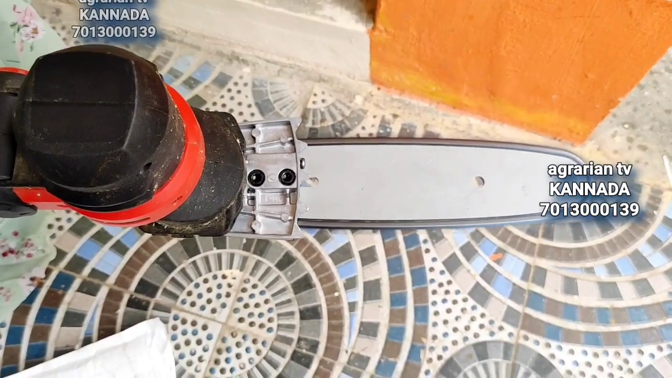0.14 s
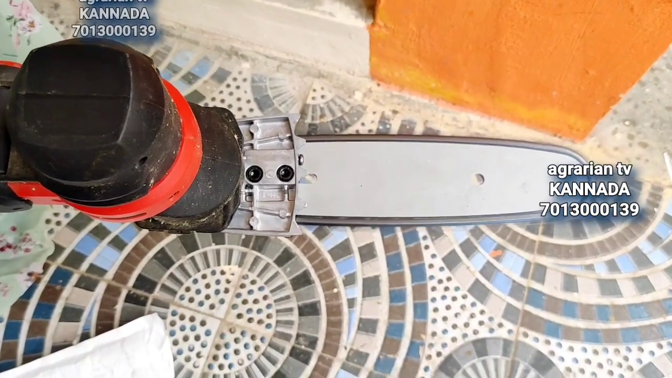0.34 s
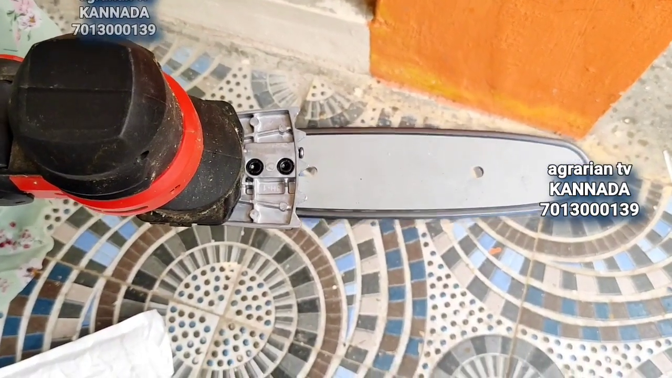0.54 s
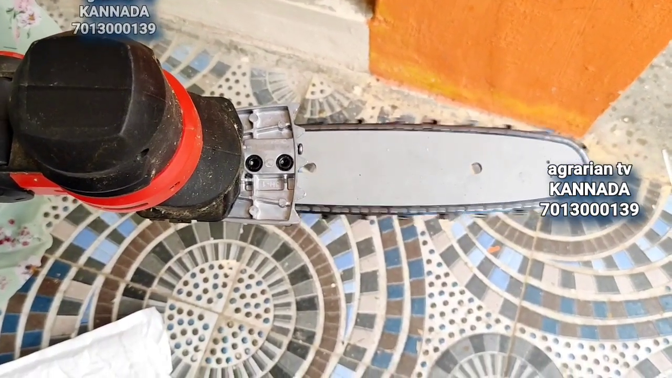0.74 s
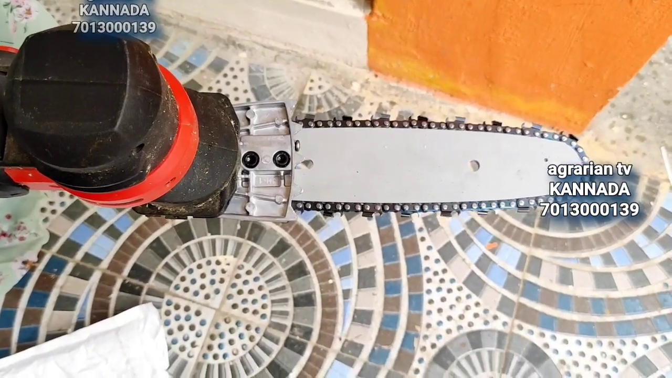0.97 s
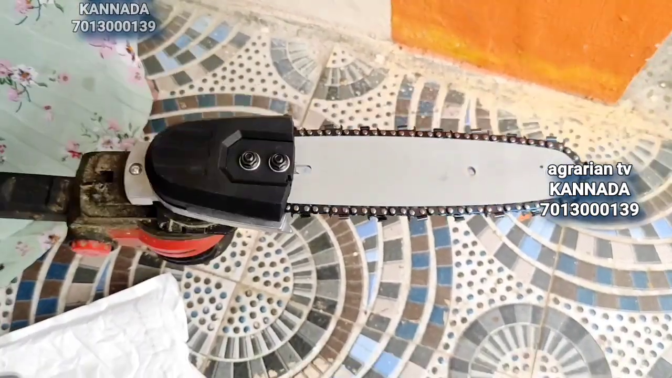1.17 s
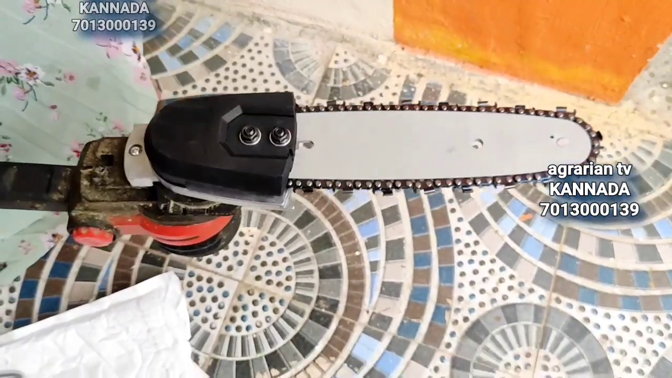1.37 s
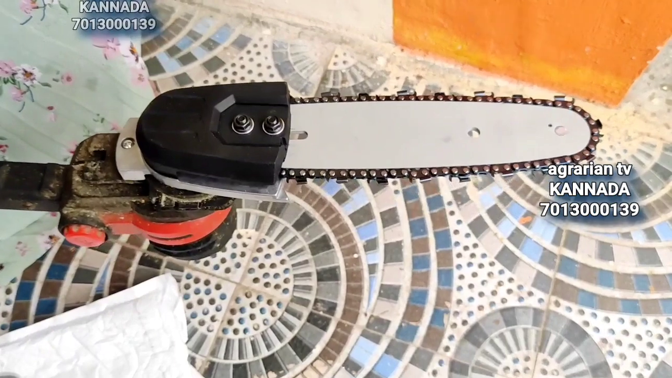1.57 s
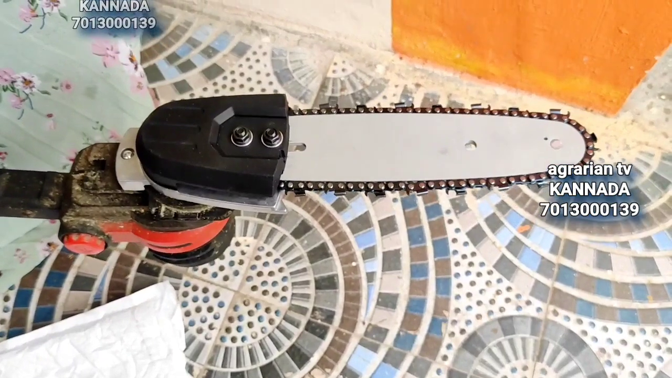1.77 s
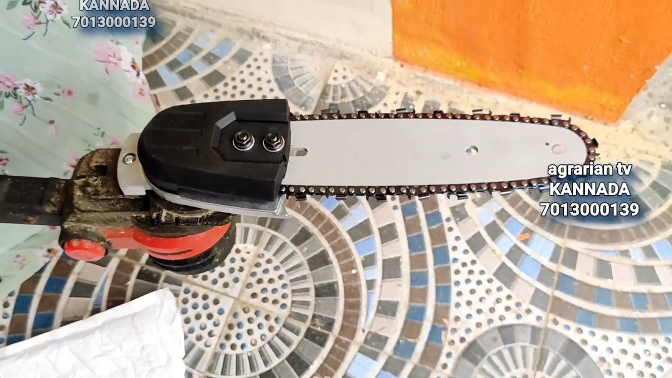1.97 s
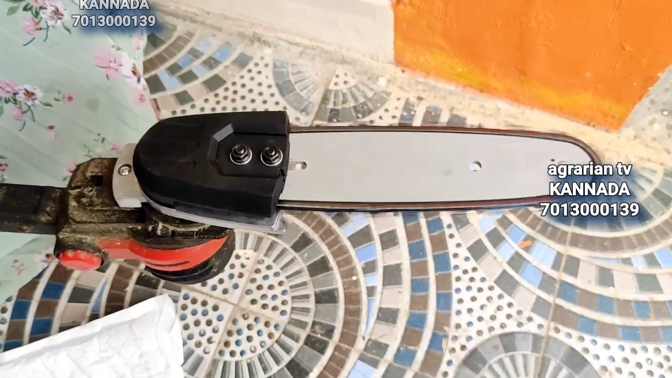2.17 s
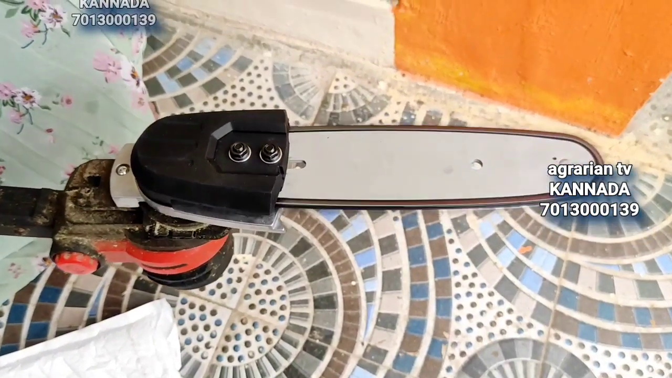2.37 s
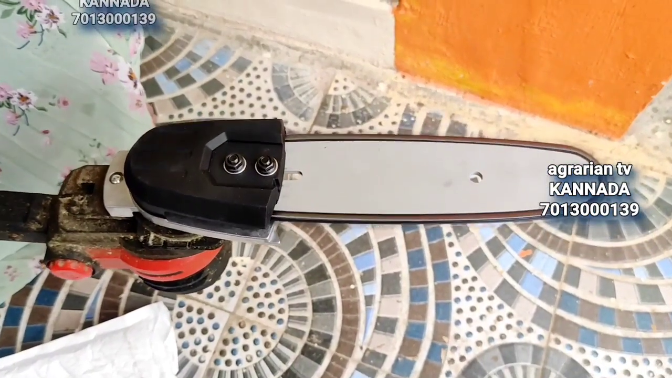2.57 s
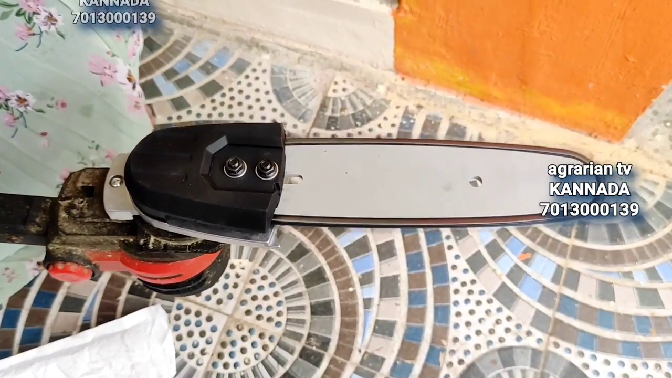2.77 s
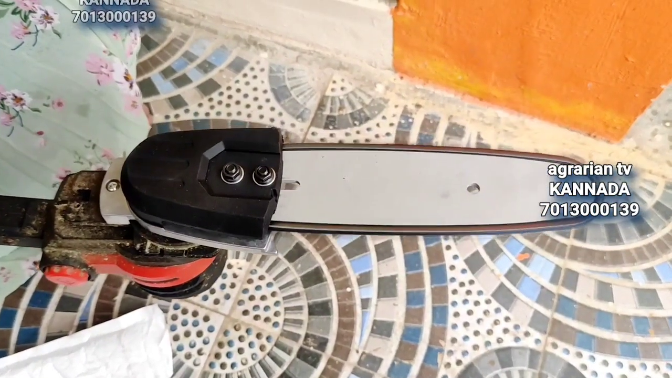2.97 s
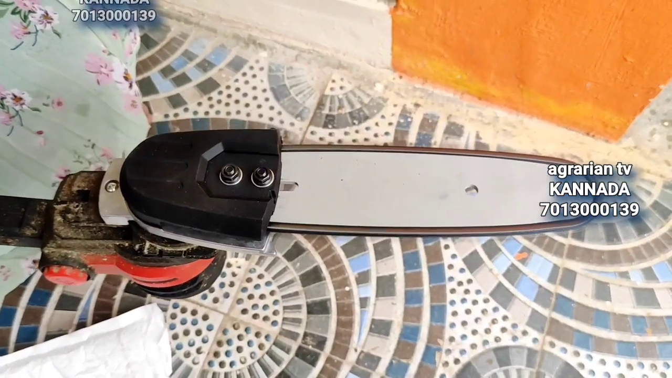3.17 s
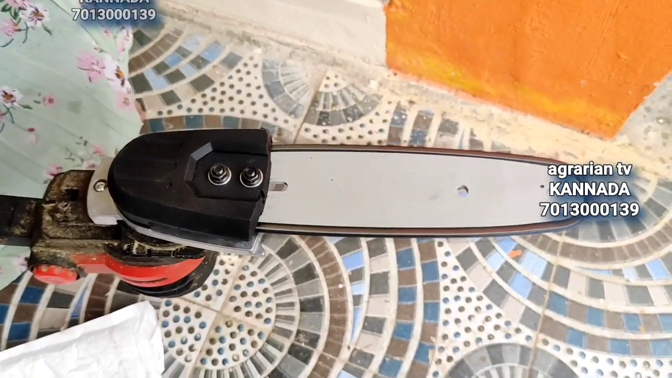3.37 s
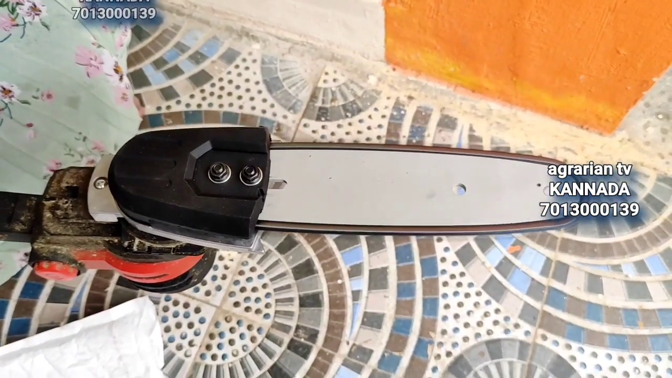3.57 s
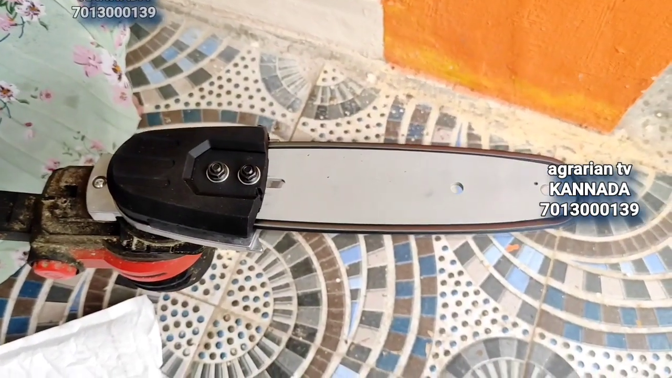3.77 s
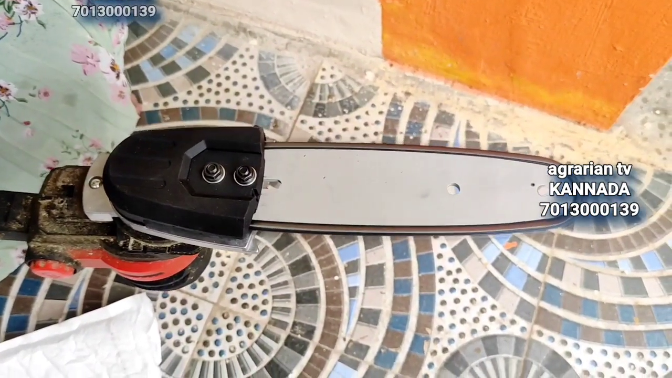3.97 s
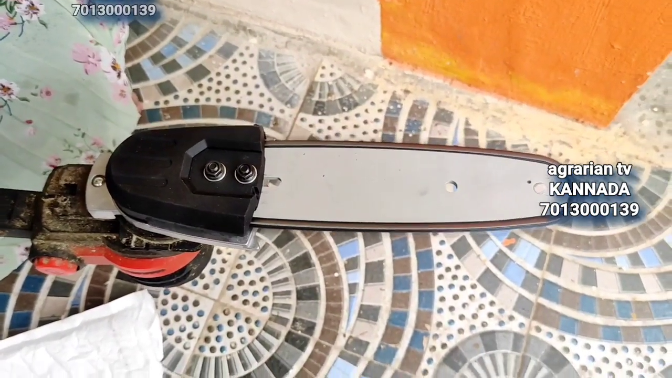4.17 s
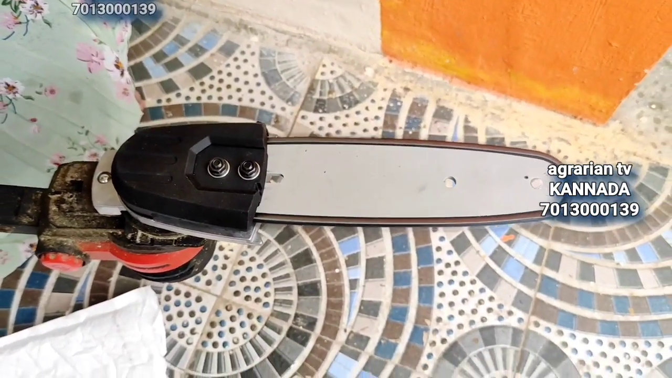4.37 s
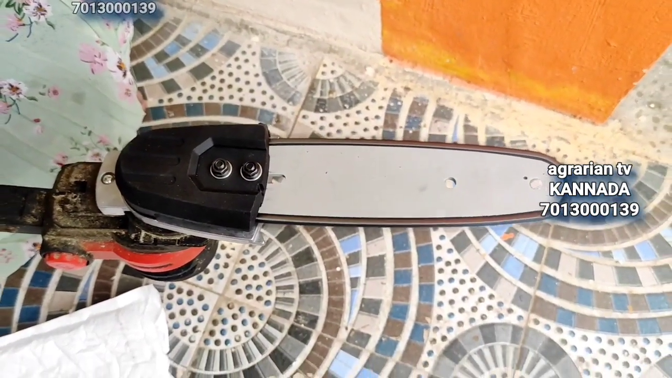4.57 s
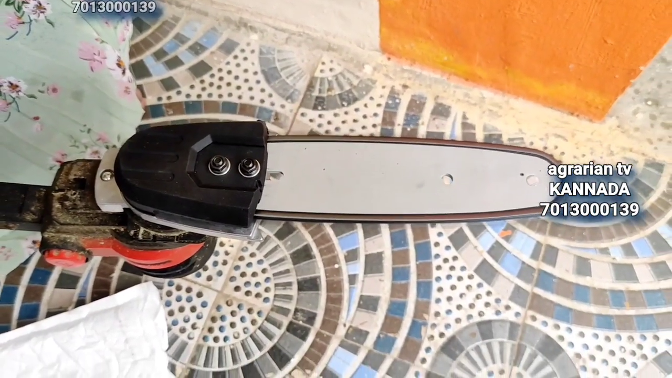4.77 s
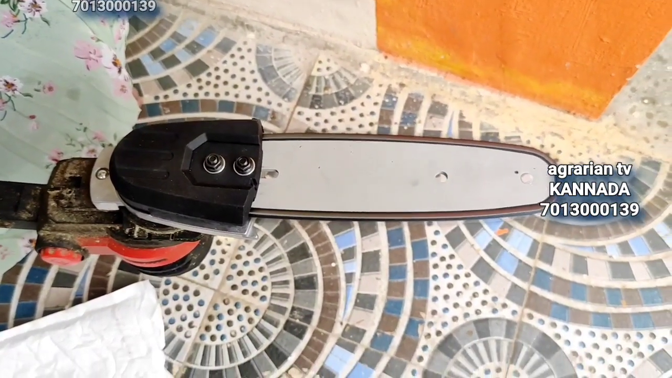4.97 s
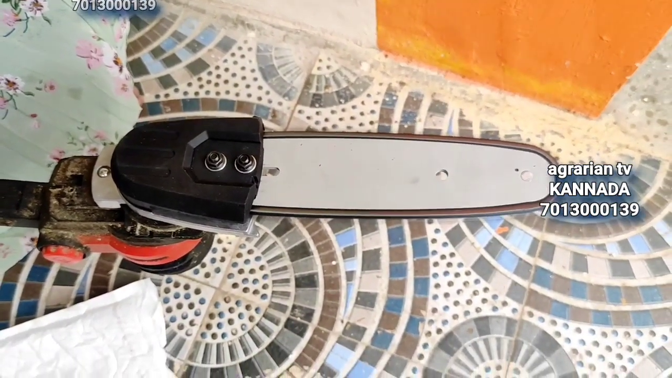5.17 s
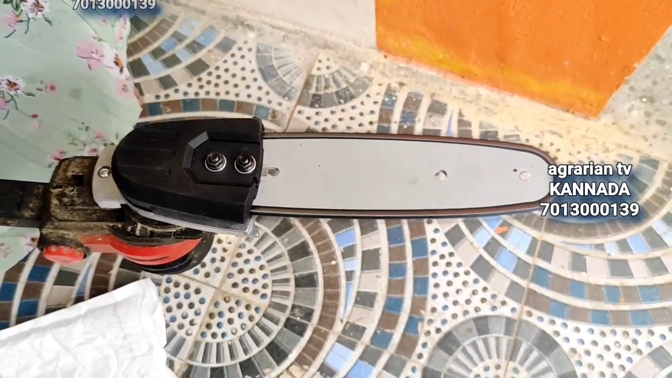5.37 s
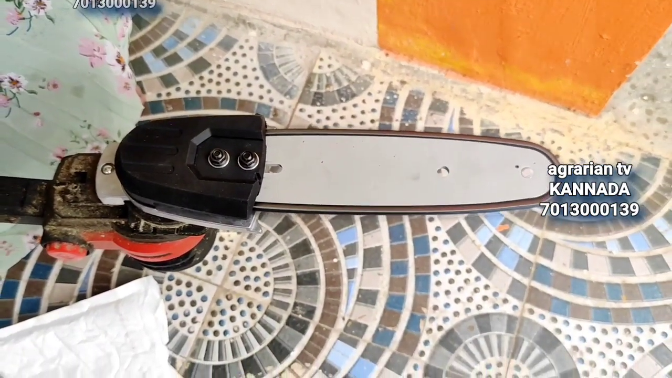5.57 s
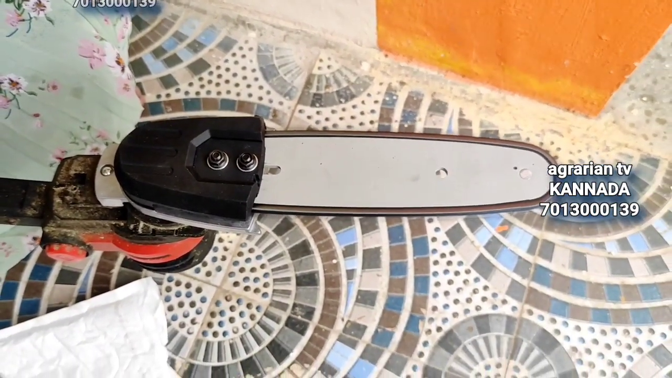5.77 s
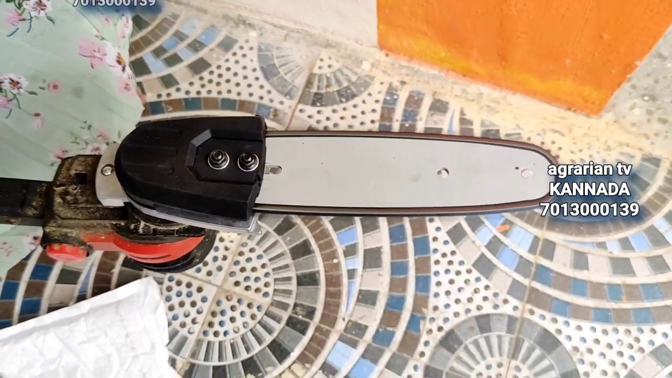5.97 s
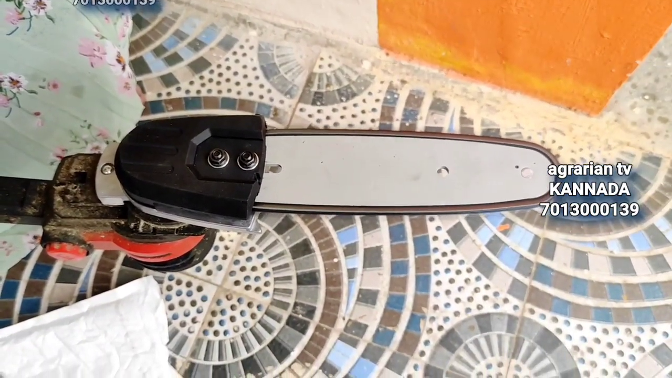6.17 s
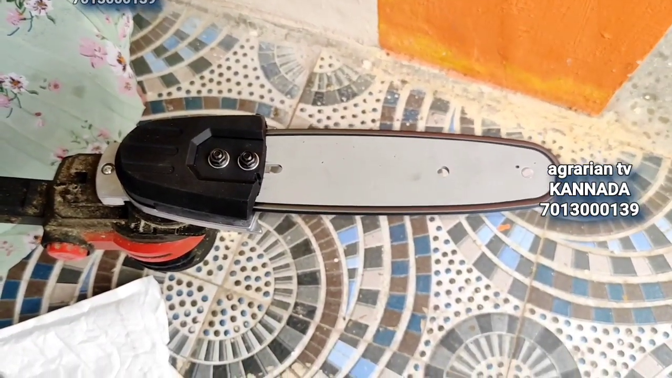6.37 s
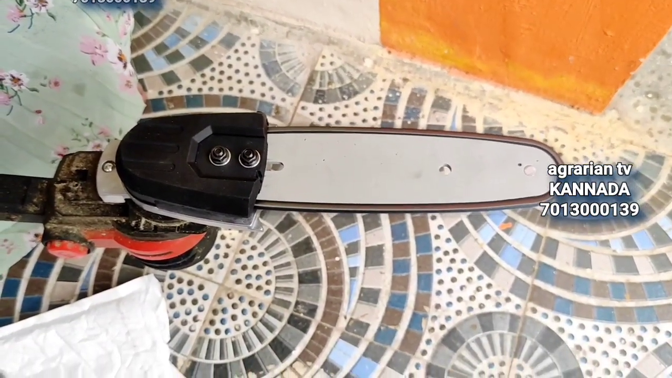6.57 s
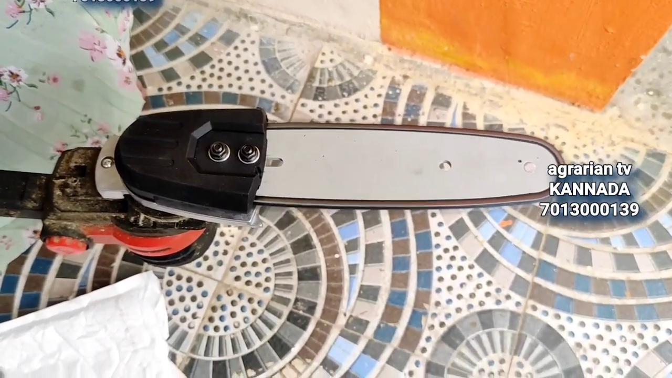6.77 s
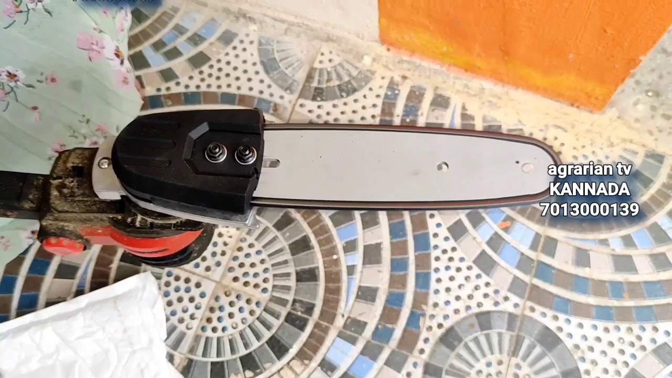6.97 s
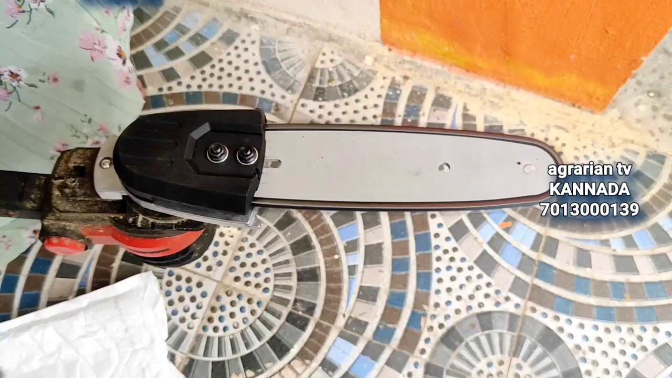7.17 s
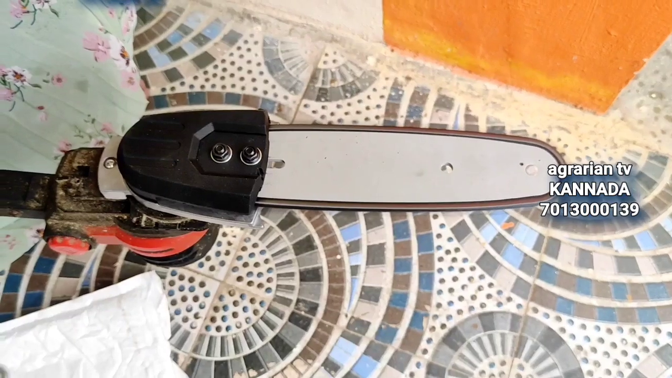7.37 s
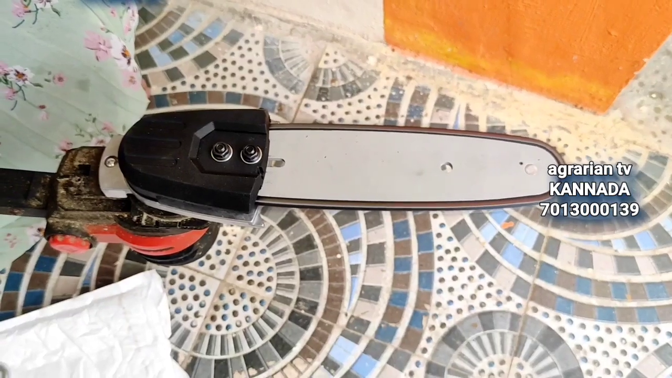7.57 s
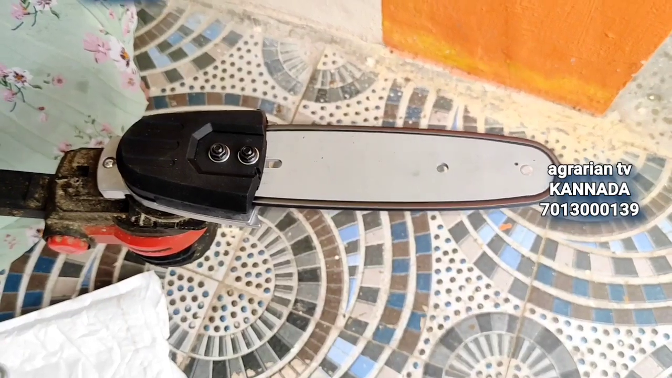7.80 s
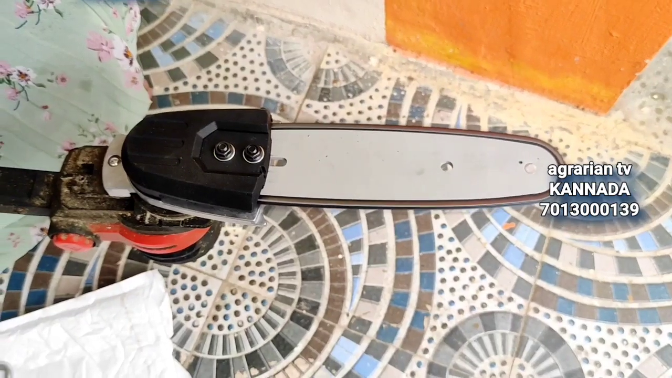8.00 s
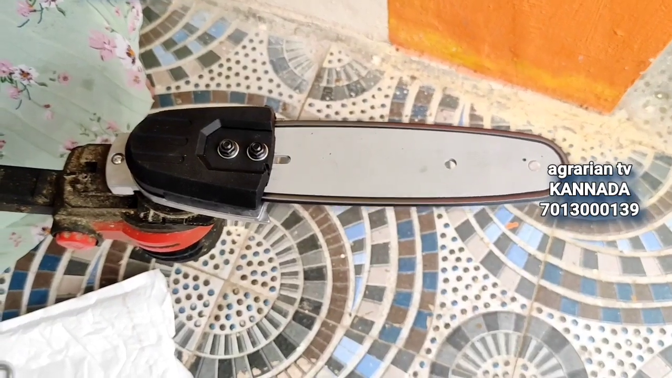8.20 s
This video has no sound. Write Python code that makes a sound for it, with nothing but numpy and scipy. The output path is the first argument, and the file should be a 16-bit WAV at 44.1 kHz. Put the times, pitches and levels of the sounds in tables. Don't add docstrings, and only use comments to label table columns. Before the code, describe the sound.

Close up in a tiled room, a battery chain cutter winds down, is handled, clicks on and races back to a bright, rattling whine.

```python
import sys
import numpy as np
from scipy import signal
from scipy.fft import rfft, irfft, next_fast_len
from scipy.io import wavfile
from scipy.ndimage import uniform_filter1d

SR = 44100
rng = np.random.default_rng(int(sys.argv[2]) if len(sys.argv) > 2 else 0)


def volts_from_db(level):
    exponent = np.asarray(level, float) / 20
    return 10 ** exponent


def materialize(psi):
    bounded = np.clip(np.atleast_2d(psi).T, -1, 1)
    quanta = np.round(bounded * 32767).astype(np.int16)
    wavfile.write(sys.argv[1], SR, quanta)


N = 363384

# (frequency [Hz], level [dB per Hz])
BODY = [(88, -62.5), (150, -22), (267, -22.5), (312, -21.5), (936, -15), (1050, -9), (1270, -11.5),
        (1980, -10), (3470, -4.5), (3670, -4.5), (3970, -4.5), (4370, -6), (7080, -10.5), (14300, -22),
        (15000, -65)]
# (frequency [Hz], width [Hz], level [dB])
RINGS = [
    [(647, 80, 5), (1640, 470, 5), (2620, 540, 6), (3040, 32, 5.5), (3340, 36, 9), (3744, 70, 9.5),
     (5180, 160, 3.5), (6940, 800, 5.5)],
    [(615, 45, 3), (1155, 270, 1.5), (1700, 140, 1), (2200, 83, -0.5), (2365, 330, 6), (3330, 118, 2),
     (3823, 97, 5), (5000, 300, 1.5), (7120, 580, 6)],
]
# (time [s], level [dB], left-right [dB])
BAR = [
    [(0, -26.5, -2.5), (.45, -22, 1), (.7, -20.5, 5), (1.024, -31, -2), (1.07, -44.5, 5), (1.17, -54, -5.5),
     (1.41, -63, 7)],
    [(2.48, -41, -4), (2.516, -24, 4.5), (2.59, -14, 1.5), (2.92, -16, -1), (3.2, -16, 1), (4.1, -17, 0),
     (4.85, -18, 3), (5.6, -20, 1.5), (6.5, -21, 3), (7.55, -23.5, 0.5), (8.24, -21.5, 5)],
]
STEADY_DB = -18.5
FULL_PULL_HZ_PER_S = 400


def evened(x):
    return x / np.sqrt(np.mean(x ** 2) + 1e-20)


def read(points, hz):
    f, value = np.transpose(points)
    return np.interp(np.log(hz + 1), np.log(f + 1), value)


def columns(rows, t):
    s, *values = np.transpose(rows)
    return [np.interp(t, s, v) for v in values]


def drift(top_hz, count):
    steps = rng.standard_normal((count, N // 128 + 2))
    hz = np.fft.rfftfreq(steps.shape[1], 128 / SR)
    smooth = irfft(rfft(steps) / (1 + (hz / top_hz) ** 2), steps.shape[1])
    at = np.arange(N) / 128
    return np.array([np.interp(at, np.arange(len(v)), evened(v)) for v in smooth])


def coloured(x, gain_db):
    size = next_fast_len(N)
    gain = volts_from_db(gain_db(np.fft.rfftfreq(size, 1 / SR)))
    return irfft(rfft(x, size) * gain, size)[..., :N]


def shaped(x, gain_db):
    hz, s, z = signal.stft(x, SR, nperseg=512, noverlap=384)
    z = z * volts_from_db(gain_db(hz[:, None], s))
    return signal.istft(z, SR, nperseg=512, noverlap=384)[1][..., :N]


def add(mix, s, sound):
    part = mix[..., round(s * SR):][..., :sound.shape[-1]]
    part += sound[..., :part.shape[-1]]


def spaced(x):
    return np.array([np.roll(x, 10), x])


def resonances_db(hz, peaks):
    return sum(db / (1 + (2 * (hz - f) / width) ** 2) for f, width, db in peaks)


def body_db(hz, peaks):
    return read(BODY, hz) + resonances_db(hz, peaks)


def bar(s):
    # (time [s], level [dB], length [s], left-right [dB])
    whips = [(.03, 5, .03, 1), (.5, 1, 0.01, 4), (.62, -5, 0.058, 0.5), (.67, 3.5, .03, -1.5),
             (3.05, 2, 0.018, 0.5), (3.09, -0.5, 0.036, -4), (3.64, 2, 0.17, -1), (4.87, -1.5, .05, 5.5),
             (5.87, -0.5, 0.022, 3.5), (5.93, 1, 0.042, -7), (6.0, 0, .04, 5), (6.14, -2, 0.077, -5),
             (6.66, 3, 0.064, -2), (6.8, -1.5, 0.14, -1.5), (6.865, 8, 0.02, -1), (7.14, 0, .06, -2),
             (7.25, 0.5, 0.06, 4), (7.31, -4.5, 0.043, -3), (7.38, 5.5, 0.13, -4)]
    rest = [(1.425, -105, 2), (2.47, -62, -2)]
    level, pan = columns(BAR[0] + rest + BAR[1], s)
    bumps = np.array([np.exp(-((s - at) / length) ** 2) for at, _, length, _ in whips])
    _, whip, _, aside = np.transpose(whips) @ bumps
    return level, whip, pan + aside


def rattle_clumps(hz, s):
    # (frequency [Hz], depth [dB])
    clump_depth = [(300, 0), (3000, 3.5), (8000, 2), (12000, 3)]
    high = np.clip(np.log2(hz / 5000 + 1e-9), 0, 1)
    noise = uniform_filter1d(rng.standard_normal((len(s), len(hz))), size=18, axis=0).T
    narrow = evened(uniform_filter1d(noise, size=2, axis=0))
    wide = evened(uniform_filter1d(noise, size=12, axis=0))
    return read(clump_depth, hz) * ((1 - high) * narrow + high * wide)


def chain(rotor_hz):
    # (treble [dB], bass [dB], left-right [dB])
    wander_db = (-3, 1.5, 0.5)
    # (start [s], growth [s], frequency [Hz], width [Hz], level [dB])
    loose_cover = (6.9, .6, 2370, 90, 8)
    links_per_turn = 6 * 11 / 40
    links = np.cumsum(rotor_hz * (1 + 0.12 * drift(60, count=1)[0])) * links_per_turn / SR
    knocks = (np.diff(np.floor(links), prepend=0) > 0) * volts_from_db(rng.standard_normal(N))
    bursts = signal.oaconvolve(knocks, np.exp(-np.arange(2000) / (0.0016 * SR)))[:N]
    bursts /= np.sqrt(uniform_filter1d(bursts ** 2, size=4000) + 1e-9)

    coasting = np.gradient(rotor_hz) * SR < -50
    knock = np.where(coasting, 0.45, 0.37)
    knock = knock * np.clip(rotor_hz / 120 - .3, 0, 1)
    envelope = knock * bursts + 1 - knock
    envelope /= np.sqrt(uniform_filter1d(envelope ** 2, size=4000))

    common, *apart = rng.standard_normal((3, N))
    own = 0.89
    rattle = np.sqrt(1 - own ** 2) * spaced(common * envelope) + own * np.array(apart) * envelope
    rattle = rattle * volts_from_db(drift(57, count=2))
    first, second = (coloured(rattle, lambda hz: body_db(hz, peaks)) for peaks in RINGS)
    rattle = np.where(np.arange(N) < 2 * SR, first, second)

    def lean_db(hz, s):
        level, whip, pan = bar(s)
        wander = [db * evened(uniform_filter1d(rng.standard_normal(len(s)), size=30)) for db in wander_db]
        speed = np.interp(s * SR, np.arange(N), rotor_hz)
        slow = np.log2(rotor_hz.max() / speed)
        treble = -0.5 - 3.5 * slow - 0.48 * whip + wander[0]
        bass = -3.5 + 0.41 * (STEADY_DB - level) - 0.27 * whip + wander[1]
        high = np.clip(np.log2(hz / 5000 + 1e-9), 0, 1)
        low = np.clip(np.log2(2000 / (hz + 1)), 0, 1)
        level = level + whip + treble * high + bass * low + rattle_clumps(hz, s)
        pull = np.clip(-np.gradient(slow, s) * np.log(2) * speed / FULL_PULL_HZ_PER_S, 0, 1)
        level = level + 1.1 * pull * speed / rotor_hz.max() * resonances_db(hz, RINGS[1])
        start, growth, *peak = loose_cover
        level = level + np.clip((s - start) / growth, 0, 1) * resonances_db(hz, [peak])
        return level + np.array([.5, -.5])[:, None, None] * (pan + wander[2] - 3.5)

    return shaped(evened(rattle), lean_db)


def follows(law, rotor_hz):
    first_db, second_db, per_octave_db, share, pull_db, coast_db = law
    t = np.arange(0, N, 64)
    hz = rotor_hz[t]
    pull = uniform_filter1d(np.gradient(hz) * SR / 64 / FULL_PULL_HZ_PER_S, size=30)
    level = np.maximum(columns(BAR[1], t / SR)[0] - STEADY_DB, -8)
    db = np.where(t < 2 * SR, first_db, second_db + share * level)
    db = db + per_octave_db * np.log2(hz / hz.max())
    db = db + pull_db * np.clip(pull, 0, 1) + coast_db * np.clip(-2 * pull, 0, 1)
    return np.interp(np.arange(N), t, np.where(hz > 25, db, -99))


def whine(orders, rows, rotor_hz, level_db, waver_db, blur, lean):
    turns, out = np.cumsum(rotor_hz) / SR, np.zeros((2, N))
    wavers, blurs = drift(6.1, count=len(orders)), drift(29.0, count=len(orders))
    coarse = np.arange(0, N, 64)
    first_run = coarse < 2 * SR
    for order, (first_db, second_db, pan_db), waver, wobble in zip(orders, rows, wavers, blurs):
        hz, top_hz = order * rotor_hz[coarse], order * rotor_hz.max()
        first, second = (body_db(hz, peaks) - body_db(top_hz, peaks) for peaks in RINGS)
        db = np.where(first_run, first_db + lean * first, second_db + lean * second)
        db = np.interp(np.arange(N), coarse, db) + waver_db * waver
        tone = np.sin(2 * np.pi * order * turns + blur * wobble)
        out += spaced(volts_from_db(db) * tone) * volts_from_db([[pan_db / 2], [-pan_db / 2]])
    return np.sqrt(2) * volts_from_db(level_db) * out


def motor_hum(rotor_hz):
    hum_orders = [1, 1.455, 2, 2.91, 3.69]
    # (first run [dB], second run [dB], left-right [dB])
    hum_lines = [(-3.5, 1, -1.5), (-7, -9, 0.5), (-30, -2, 0), (-1, -7, 4), (4, 0, 1.5)]
    # (first run [dB], second run [dB], speed [dB per octave], share of bar level, pull [dB], coasting [dB])
    hum_law = (-56, -51.5, 24, .1, 4, -20)
    return whine(hum_orders, hum_lines, rotor_hz, follows(hum_law, rotor_hz), waver_db=1.0, blur=0.24, lean=0)


def rotor_whine(rotor_hz):
    rotor_orders = [2, 4, 6, 8, 10]
    # (first run [dB], second run [dB], left-right [dB])
    rotor_lines = [(-13, -45, -5.5), (-3.5, -1.5, 7.5), (-13, -15.5, 3), (-1.5, -20, -3), (-9.5, 0, 5)]
    # (first run [dB], second run [dB], speed [dB per octave], share of bar level, pull [dB], coasting [dB])
    rotor_law = (-35, -37.5, 26, 1.6, 11.5, -14)
    level_db = follows(rotor_law, rotor_hz)
    return whine(rotor_orders, rotor_lines, rotor_hz, level_db, waver_db=2.0, blur=0.22, lean=0.039)


def gear_whine(rotor_hz):
    mesh_orders = [9, 9.71, 11, 11.34, 11.64, 12, 12.34, 12.65, 13, 13.65, 14, 14.29, 14.65, 15.52, 16.3,
                   17.9]
    # (first run [dB], second run [dB], left-right [dB])
    mesh_lines = [(-23.5, -18.5, 7.5), (-19.5, -8, 10), (5, 5.5, 2.5), (-4, 3.5, -19), (-10.5, -14.5, -5.5),
                  (-20, -12.5, -9), (-13.5, -6.5, -0.5), (2, 7, -1.5), (1.5, -0.5, -7), (-0.5, -25.5, 5.5),
                  (-7.5, -20.5, -0.5), (-24, -5.5, 14), (-23.5, -8, 19.5), (-20, -11.5, 18),
                  (-24.5, -29, 0.5), (-17, -10.5, 18)]
    # (first run [dB], second run [dB], speed [dB per octave], share of bar level, pull [dB], coasting [dB])
    mesh_law = (-28, -30.5, 5, 1.1, -5, -14)
    level_db = follows(mesh_law, rotor_hz) - 4
    return whine(mesh_orders, mesh_lines, rotor_hz, level_db, waver_db=2.3, blur=0.5, lean=0.53)


def room(x, t60=0.17):
    taps = np.zeros((2, 16000))
    at = np.arange(120, 15980, 20) + rng.integers(0, 20, (2, 793))
    np.put_along_axis(taps, at, rng.choice([-1., 1.], at.shape), 1)
    taps *= volts_from_db(-60 * np.arange(16000) / SR / t60)
    return signal.oaconvolve(x, taps / np.linalg.norm(taps[0]), axes=1)[:, :N]


def air():
    # (frequency [Hz], level [dB per Hz])
    rumble_colour = [(12, -63), (20, -25.5), (51, -7.5), (81, -2.5), (112, -6), (138, -11), (152, -34),
                     (250, -38), (320, -67), (550, -120)]
    # (time [s], level [dB])
    rumble_level = [(0, -58.5), (1.41, -64.5), (1.43, -48.5), (2.05, -59.5), (2.3, -54), (4.8, -57),
                    (8.24, -60.5)]
    # (frequency [Hz], level [dB per Hz])
    hiss_colour = [(88, -29), (150, -3), (318, -7), (364, -12.5), (636, -10), (1670, -16.5), (3970, -20.5),
                   (9270, -30.5), (13900, -26), (15000, -38)]
    # (time [s], length [s], frequency [Hz], level [dB])
    chirps = [
        (1.715, 0.066, 3830, -70),
        (2.16, 0.15, 3830, -71),
        (2.35, 0.094, 620, -60),
    ]
    a, b, *hiss = rng.standard_normal((4, N))
    same = 0.28
    rumble = coloured([a, same * a + np.sqrt(1 - same ** 2) * b], lambda hz: read(rumble_colour, hz))
    out = evened(rumble) * volts_from_db(columns(rumble_level, np.arange(N) / SR)[0])
    out += evened(coloured(hiss, lambda hz: read(hiss_colour, hz))) * volts_from_db(-62)
    for s, length, hz, db in chirps:
        t = np.arange(0, length, 1 / SR)
        add(out, s, volts_from_db(db) * np.sin(2 * np.pi * hz * t) * signal.windows.tukey(len(t), .4))
    return out


def last_links():
    # (frequency [Hz], level [dB], t60 [s])
    tick_modes = [(2350, -1, .02), (2920, -2.5, 0.035), (3660, 0, 0.023), (4330, 0, 0.016), (5200, -2, .01),
                  (6800, -17.5, 0.0055)]
    t, out = np.arange(2500) / SR, np.zeros((2, N))
    for k in range(13):
        weak = k % 2
        late = k * .01425 + k * k * .00005
        db = -22 - 105 * late - 2.5 * weak - 10 * np.exp(-late / .02)
        ring = np.zeros((2, len(t)))
        for hz, mode_db, t60 in tick_modes:
            if weak and hz >= 4000:
                continue
            decay = volts_from_db(mode_db - 60 * t / t60 + 2 * rng.standard_normal((2, 1)))
            grit = 1 + 0.68 * evened(uniform_filter1d(rng.standard_normal(len(t)), size=30))
            ring += decay * np.sin(2 * np.pi * hz * rng.uniform(0.86, 1.05) * t) * grit
        add(out, 1.0825 + late, volts_from_db(db - 10.5) * ring * np.minimum(t / .0004, 1))
    return out


def handling():
    # (time [s], t60 [s], level [dB], centre [Hz], width [octaves])
    scuffs = [(1.261, .15, -48, 250, 1.5), (1.291, .035, -47, 3000, 1.2), (1.309, 0.042, -47.5, 3000, 1.3),
              (1.31, 0.18, -46, 220, 1.4), (1.424, 0.14, -49, 250, 2.84), (1.721, .05, -53, 1700, 2.2),
              (1.765, 0.25, -48.5, 1500, 3.2), (1.78, 0.17, -47.5, 350, 2), (1.925, .2, -62, 5000, 0.73),
              (2.05, .12, -64, 2500, 2.3), (2.255, .25, -54.5, 2970, 1.8), (2.316, .1, -40, 2200, 2.8),
              (2.335, .21, -44, 3480, 1.5), (2.302, 0.31, -44.5, 300, 3)]
    t, out = np.arange(12000) / SR, np.zeros((2, N))
    for s, t60, db, hz, octaves in scuffs:
        half = 2 ** (octaves / 2)
        band = signal.butter(2, [hz / half, min(hz * half, 18000)], "band", fs=SR, output="sos")
        puff = evened(signal.sosfilt(band, rng.standard_normal((2, len(t)))))
        rise = 1 - np.exp(-(t / (0.2 * t60 ** 2)) ** 2)
        add(out, s, puff * volts_from_db(db - 60 * t / t60) * rise)
    return out


def trigger():
    # (time [s], peak level [dB])
    contacts = [
        (2.458, -26),
        (2.4648, -24),
        (2.4706, -37),
    ]
    # (frequency [Hz], level [dB], t60 [s])
    grip_modes = [(935, -20, 0.024), (2200, -8, .04), (2630, -1, .02), (2980, 6, 0.022), (3420, -10, 0.017),
                  (4530, -7, 0.019)]
    t, out = np.arange(2500) / SR, np.zeros(N)
    ring = sum(volts_from_db(db - 60 * t / t60) * np.sin(2 * np.pi * hz * t) for hz, db, t60 in grip_modes)
    ring = ring * (1 - np.exp(-(t / 0.00087) ** 2))
    for s, peak_db in contacts:
        add(out, s, volts_from_db(peak_db + 5.5) * ring)
    return spaced(out)


def pull_whine(rotor_hz):
    pull_orders = [11, 12.65, 16.3]
    # (first run [dB], second run [dB], left-right [dB])
    pull_lines = [(0, 1, 1), (0, 4, 0), (0, -8, 3)]
    # (first run [dB], second run [dB], speed [dB per octave], share of bar level, pull [dB], coasting [dB])
    pull_law = (-66.5, -61.5, 3.5, 2.5, 31.5, 6.5)
    level_db = follows(pull_law, rotor_hz)
    return whine(pull_orders, pull_lines, rotor_hz, level_db, waver_db=4.5, blur=1.6, lean=2.4)


def scene():
    # (time [s], speed [Hz])
    speed_curve = [(0, 267.7), (.41, 266), (.47, 249.5), (.68, 174), (.96, 78), (1.11, 21), (1.42, 5),
                   (2.475, 5), (2.6, 86), (2.75, 148), (2.9, 207.5), (3, 245), (3.07, 261.5), (3.17, 267.5),
                   (4.8, 270.6), (6.5, 270.6), (6.6, 268.1), (8.24, 269)]
    rotor_hz = columns(speed_curve, np.arange(N) / SR)[0]
    tool = chain(rotor_hz) + last_links()
    tool += motor_hum(rotor_hz) + rotor_whine(rotor_hz) + gear_whine(rotor_hz) + pull_whine(rotor_hz)
    click = trigger()
    reflections = volts_from_db(-7) * room(tool + 0.28 * click)
    return tool + click + reflections + handling() + air()


def band_limit(x):
    return signal.sosfilt(signal.butter(12, 14750, fs=SR, output="sos"), x)


def record(dry):
    # (frequency [Hz], left-right [dB])
    port_colour = [(60, -0.5), (150, -2.5), (370, 5), (940, 0.5), (2340, 10), (5840, 2), (14600, 2.5)]
    ports = coloured(dry, lambda hz: np.array([[.5], [-.5]]) * read(port_colour, hz))
    limited = 1.455 * np.tanh(ports / 1.342)
    return band_limit(limited)


dry = scene()
out = record(dry)
materialize(out)
```